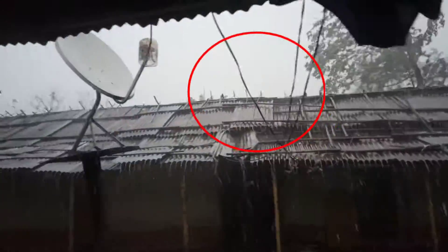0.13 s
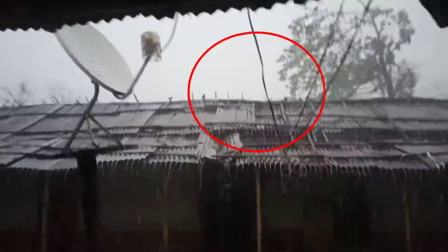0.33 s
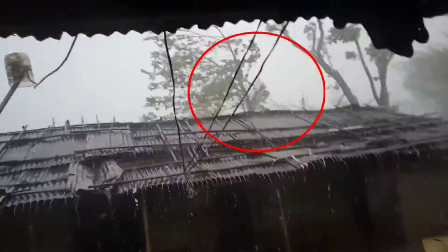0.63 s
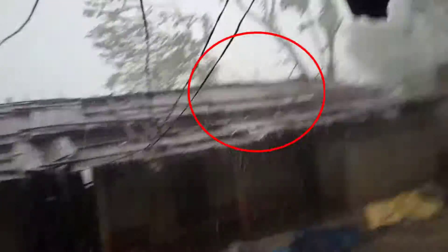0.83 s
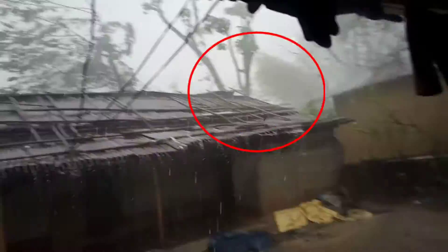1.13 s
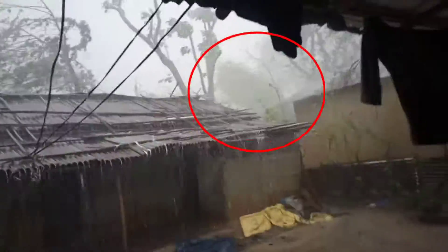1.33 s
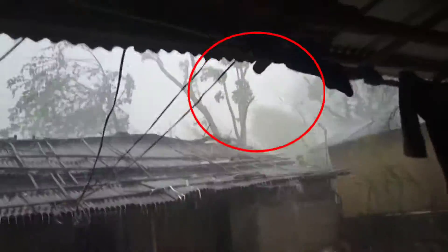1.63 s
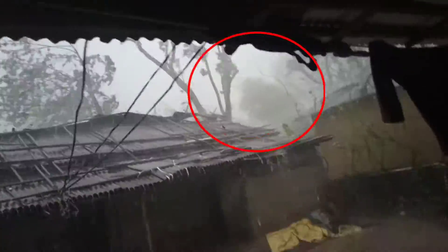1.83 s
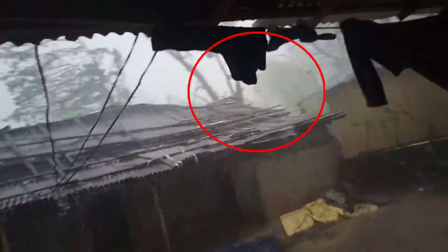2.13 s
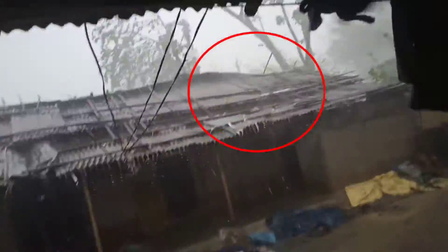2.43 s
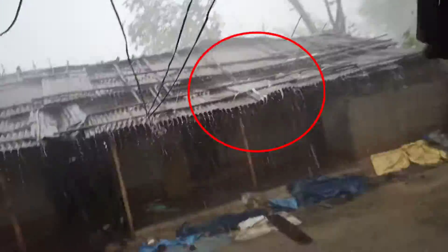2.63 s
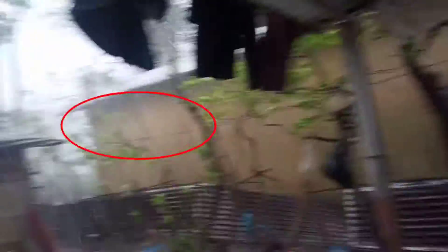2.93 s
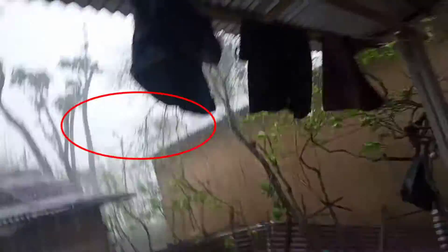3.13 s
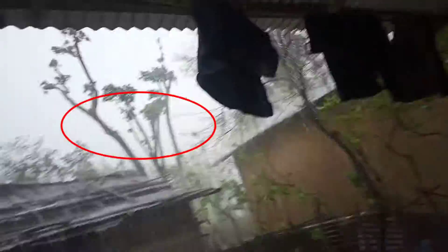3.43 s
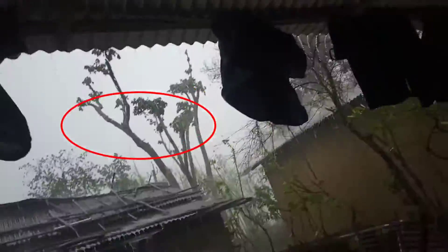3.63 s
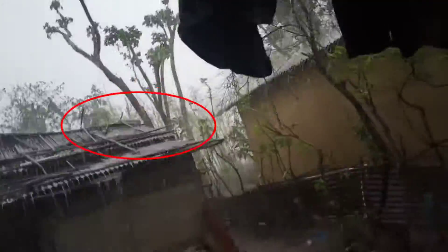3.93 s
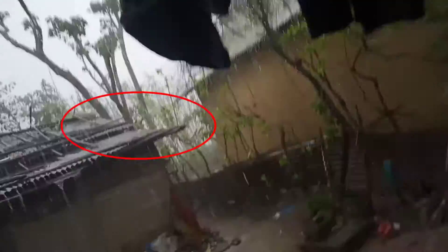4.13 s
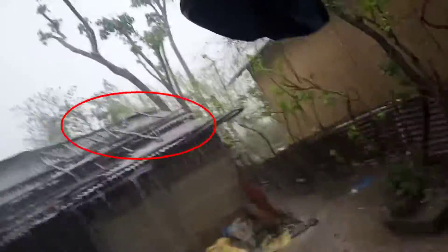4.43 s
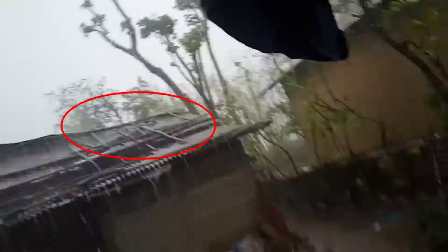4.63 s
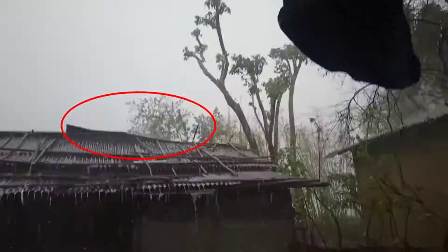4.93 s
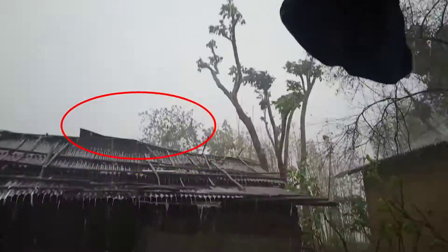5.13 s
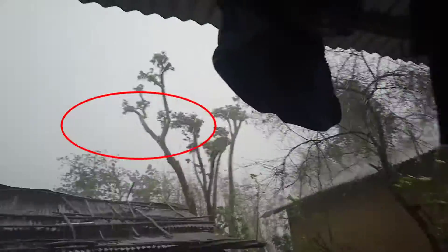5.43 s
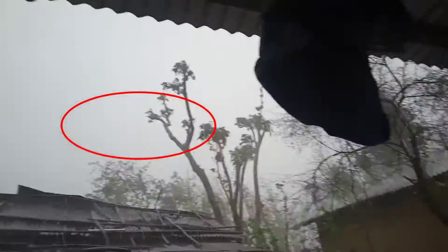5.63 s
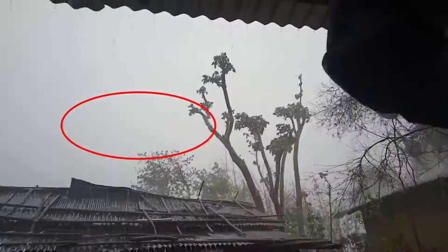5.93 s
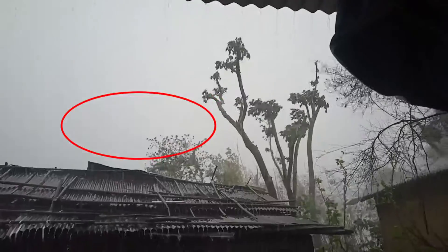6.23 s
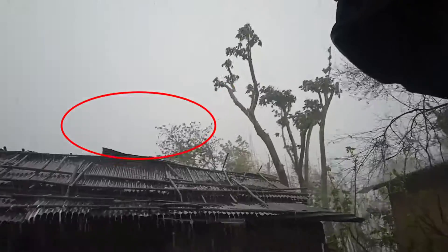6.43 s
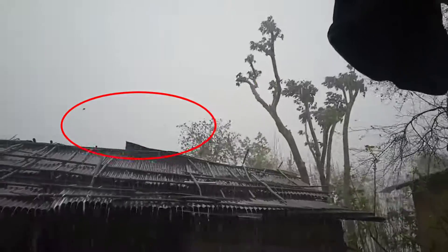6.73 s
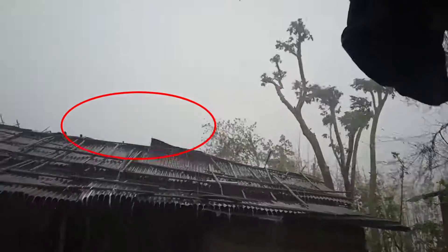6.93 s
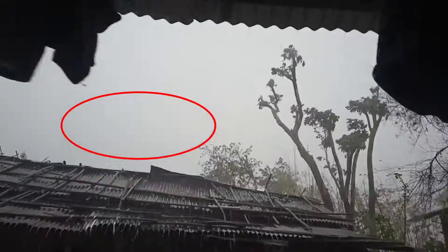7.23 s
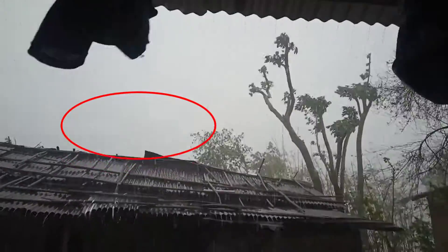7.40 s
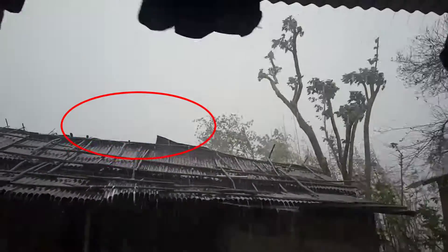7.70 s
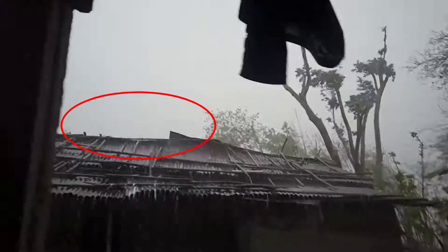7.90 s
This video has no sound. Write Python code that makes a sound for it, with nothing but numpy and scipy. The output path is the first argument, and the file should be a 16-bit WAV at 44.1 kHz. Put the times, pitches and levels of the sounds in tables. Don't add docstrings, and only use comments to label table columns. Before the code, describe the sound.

Heavy downpour hisses and drums on tin sheets, stops abruptly at three seconds, then fades back muffled, with wind thumps and scattered drips.

```python
import sys
import numpy as np
from scipy import signal
from scipy.fft import rfft, irfft, next_fast_len
from scipy.io import wavfile

SR = 44100
rng = np.random.default_rng(int(sys.argv[2]) if len(sys.argv) > 2 else 0)


def output_pcm(signal):
    pcm = np.clip(np.atleast_2d(signal).T, -1, 1) * 32767
    wavfile.write(sys.argv[1], SR, np.round(pcm).astype(np.int16))


def volts(x):
    e = np.asarray(x, float) / 20
    return 10 ** e


N = 355578
BREAK_S = 3.02


def rms_one(x):
    return x / np.sqrt(np.mean(x ** 2) + 1e-20)


def in_time(rows):
    time_s, value = np.transpose(rows)
    return np.interp(np.arange(N) / SR, time_s, value)


def drift(rate):
    coarse = 40
    r = np.exp(-2 * coarse * np.pi * rate / SR)
    noise = rng.standard_normal(N // coarse + 2002)
    slow = signal.lfilter([1], [1, -2 * r, r * r], noise)[2000:]
    return np.interp(np.arange(N) / coarse, np.arange(len(slow)), rms_one(slow))


def ring(push, hz, t60_s):
    r = volts(-60 / (t60_s * SR))
    w = 2 * np.pi * hz / SR
    return signal.lfilter([0, np.sin(w)], [1, -2 * r * np.cos(w), r * r], push)


def add(out, time_s, sound):
    i = round(time_s * SR)
    out[i:i + len(sound)] += sound[:N - i]


def high_pass(x, hz):
    return signal.sosfilt(signal.butter(2, hz, "high", fs=SR, output="sos"), x)


def blows(table, swell_share, trim_db):
    out = np.zeros(N)
    chance = rng.uniform(-1.38, 1, (len(table), 2))
    for (time_s, db, hz, t60_s), (under, over) in zip(table, chance):
        modes = (1, 1), (0.7 + 0.072 * under, 0.4), (1.6 + 0.142 * over, 0.5)
        width = round(swell_share * t60_s * SR)
        sound = 0
        for ratio, share in modes:
            push = np.zeros(SR // 2)
            push[:width] = np.hanning(width) * np.cos(2 * np.pi * ratio * hz * np.arange(width) / SR)
            sound = sound + share * rms_one(ring(push, ratio * hz, t60_s))
        add(out, time_s, volts(db + trim_db) * sound / np.abs(sound).max())
    return out


# (time [s], peak level [dB], frequency [Hz], t60 [s])
BUFFET_EVENTS = [(2.82, -32, 152, 0.15), (3.25, -36, 70, 0.107), (3.39, -31, 118, 0.12),
                 (3.94, -28.5, 98, 0.15), (3.99, -34, 59.6, 0.14), (4.925, -25, 135, 0.09),
                 (4.94, -34, 55.4, 0.091), (5.3, -37, 59.7, 0.18), (5.44, -35, 119, 0.092),
                 (5.6, -31, 123, 0.064), (5.745, -21, 176, 0.061), (5.755, -28, 71, 0.12),
                 (5.83, -32, 110, .1), (5.93, -37, 69, .08), (6.68, -28, 101, 0.16),
                 (7.155, -28, 151, 0.13), (7.226, -24, 124.6, 0.14), (7.32, -27, 144, 0.11),
                 (7.415, -25, 148, 0.1), (7.42, -37, 80, 0.14), (7.95, -32, 94.5, 0.17),
                 (8.0, -35, 50, 0.14), (5.86, -27.5, 167, 0.13), (7.24, -30, 50, 0.13),
                 (7.44, -29, 48, 0.13), (7.46, -28, 100, 0.092), (5.9, -32, 130, 0.18),
                 (7.88, -29, 115, .14)]


def buffets():
    return high_pass(blows(BUFFET_EVENTS, swell_share=0.24, trim_db=-2.5), 45)


# (time [s], peak level [dB], frequency [Hz], t60 [s])
BOOM_EVENTS = [(0.064, -16.5, 500, 0.12), (0.123, -24, 485, 0.14), (0.209, -21, 493, 0.11),
               (0.444, -22, 786, 0.084), (0.499, -23, 393, 0.15), (0.564, -23, 610, 0.096),
               (0.813, -17, 396, 0.078), (0.864, -18.5, 600, 0.1), (0.825, -22, 805, .14),
               (1.157, -24, 346, 0.14), (1.254, -21.5, 385, 0.077), (1.699, -22, 400, 0.12),
               (1.764, -25, 480, 0.067), (2.579, -23.5, 410, 0.11), (2.828, -25.5, 252, 0.13),
               (7.395, -18, 440, 0.1), (7.579, -16.5, 385, 0.099), (7.659, -15.5, 250, 0.17),
               (0.47, -20, 487, 0.13), (0.52, -19.5, 472, 0.13), (0.56, -21, 415, .1),
               (0.835, -19.5, 521, 0.12), (0.83, -22, 250, .12), (0.05, -21.5, 251, .1),
               (0.61, -26, 353, 0.16), (7.225, -19.5, 201, 0.11), (7.585, -19, 242, 0.12),
               (7.77, -21, 190, 0.086), (7.92, -20, 444, 0.092)]


def booms():
    return high_pass(blows(BOOM_EVENTS, swell_share=0.117, trim_db=-5.5), 180)


# (time [s], peak level [dB], frequency [Hz], t60 [s])
SPLAT_EVENTS = [
    (1.842, -22, 3000, 0.07),
    (1.863, -19, 5500, .09),
    (2.829, -19.5, 5540, 0.11),
    (4.795, -17, 2300, 0.05),
    (4.826, -18.5, 3330, 0.06),
    (4.876, -19, 3050, .04),
    (6.895, -28, 5500, 0.066),
]


def splats():
    out = np.zeros(N)
    t = np.arange(SR // 4) / SR
    for time_s, db, hz, t60_s in SPLAT_EVENTS:
        spray = rng.standard_normal(len(t)) * volts(-60 * t / t60_s) * np.minimum(t / 0.005, 1)
        band = signal.butter(2, [0.5 * hz, 2.05 * hz], "band", fs=SR, output="sos")
        sound = rms_one(signal.sosfilt(band, spray)) + 1.6 * rms_one(ring(spray, hz, 0.003))
        add(out, time_s, volts(db) * sound / np.abs(sound).max())
    return out


def hollow(hz, db, width_hz):
    r = np.exp(-np.pi * width_hz / SR)
    swell = signal.lfilter([1], [1, -2 * r, r * r], rng.standard_normal((2, N)))
    phase = 2 * np.pi * np.cumsum(hz) / SR
    return volts(db + 0.95 * drift(6.3)) * rms_one(swell[0] * np.cos(phase) + swell[1] * np.sin(phase))


def cupped_hand(sky, rain_db, gust_db):
    wall_hz, sky_hz = 1741, 2119
    wall = 1 - sky
    hz = wall_hz + sky * (sky_hz - wall_hz) + wall * 30 * gust_db + sky * 25 * rain_db
    db = -31 + 0.45 * rain_db + (sky * 0.42 - wall * 0.33) * gust_db
    return hollow(hz, db, width_hz=700.0)


def drops(per_s, spread_db, near_db):
    size_db = spread_db * np.minimum(rng.exponential(1, N), 5.5)
    sizes = volts(size_db) * rng.choice([-1, 1], N)
    near = sizes * (rng.random(N) < per_s / SR)
    return rms_one(rng.standard_normal(N) + volts(near_db) * rms_one(near))


SOURCE_EDGES = [25, 200, 1130, 4500, 16000]


def rush(impacts, levels_db, colour, lumpy_db):
    size = next_fast_len(N, True)
    octave = np.log2(np.maximum(np.arange(size // 2 + 1) * SR / size, 1))
    colour_hz, colour_db = np.transpose(colour)
    tint = volts(np.interp(octave, np.log2(colour_hz), colour_db))
    spectra = [tint * rfft(x, size) for x in impacts]
    out = np.zeros(N)
    for low, high, level_db, lump_db in zip(SOURCE_EDGES, SOURCE_EDGES[1:], levels_db, lumpy_db):
        source = 0
        for step in range(round(2 * np.log2(low)), round(2 * np.log2(high))):
            away = np.clip(2 * octave - step - 0.5, -1, 1)
            band = irfft(spectra[step % 2] * np.cos(away * np.pi / 2), size)[:N]
            source = source + band * (0.5 + lump_db / 8.9 * drift(8.7))
        out += volts(level_db + 0.15 * lump_db * drift(15.0)) * rms_one(source)
    return out


# (frequency [Hz], level [dB])
EAVE_COLOUR = [(25, -48.5), (45, -38), (80, -18), (150, -12), (250, -5), (390, -3.5), (600, -4.5),
               (1000, -7.5), (1700, -7.5), (5000, -7), (6100, -10), (7600, -18.5), (11500, -12.5),
               (15400, -24.5)]
# (frequency [Hz], level [dB])
WALL_COLOUR = [(25, -22), (170, -12), (260, -14), (510, -9), (830, -8), (1500, -11.5), (2400, -14.5),
               (3510, -13), (4240, -24.5), (6000, -25), (7300, -18.5), (9750, -30.5), (11800, -35.5),
               (15400, -34)]
# (frequency [Hz], level [dB])
SKY_COLOUR = [(25, -38), (190, -13), (450, -11.5), (1000, -13.5), (1500, -8.5), (2200, -11), (2750, -11.5),
              (3600, -9.5), (4800, -16.5), (5600, -18.5), (7870, -15), (9800, -27), (11800, -33.5),
              (15400, -32.5)]
# (time [s], share of sky [0-1])
HAND_TURN = [
    (4.3, 0.01),
    (4.42, .15),
    (4.5, .75),
    (4.6, .99),
]
# (time [s], level about mean [dB])
RAIN_WEIGHT = [(0.0, 0.5), (0.46, 2), (0.8, -2), (1.12, 0.5), (1.85, 0.5), (2.05, -1), (2.92, -0.5),
               (3.2, 1), (4.36, -0.1), (4.53, 3), (4.71, 2.5), (4.85, 2.5), (5.0, 1), (5.22, 3),
               (5.58, -0.5), (5.78, 1), (6.5, 0), (6.72, 1)]
# (time [s], level about mean [dB])
WIND_LOAD = [(0.3, 0), (0.52, 2), (0.72, 0.5), (1.45, 0), (2.1, -2.5), (2.5, -2), (2.85, 0.3), (3.2, 3),
             (3.32, 6), (3.66, 5), (3.8, 3), (4.25, 2), (4.62, 0), (6.4, 0.3), (7.05, 1), (7.5, 2.5),
             (7.9, 2.5), (8.06, 3)]
RAIN_SHARE = [0.1, 0.14, 1.23, 1.2]
GUST_SHARE = [1.2, 0.99, 0.35, 0.05]


def storm():
    eave_db, wall_db, sky_db = [-47, -32, -29, -30], [-51, -33.5, -30.5, -38], [-47, -34.5, -29.5, -37.5]
    lumpy_db = [0.85, 0.33, 0.19, 0.33]
    impacts = [drops(per_s=2500.0, spread_db=5.0, near_db=-9) for _ in range(2)]
    sky = np.clip(in_time(HAND_TURN), 0, 1)
    rain_db, gust_db = in_time(RAIN_WEIGHT), in_time(WIND_LOAD)
    swing_db = np.outer(RAIN_SHARE, rain_db) + np.outer(GUST_SHARE, gust_db)
    before = rush(impacts, swing_db + np.c_[eave_db], EAVE_COLOUR, lumpy_db)
    wall = rush(impacts, swing_db + np.c_[wall_db], WALL_COLOUR, lumpy_db)
    open_sky = rush(impacts[::-1], swing_db + np.c_[sky_db], SKY_COLOUR, lumpy_db)
    after = np.sqrt(1 - sky) * wall + np.sqrt(sky) * open_sky + cupped_hand(sky, rain_db, gust_db)
    return np.where(np.arange(N) < BREAK_S * SR, before, after)


def scene():
    nearer = volts(np.where(np.arange(N) < BREAK_S * SR, 4.5, 1.0))
    mono = storm() + nearer * (booms() + buffets() + splats())
    return np.array([mono, mono])


def break_gain():
    stop_s, fade_start_s, fade_s, fade_power = 2.9602, 3.0195, 0.16, 5.3
    t = np.arange(N) / SR
    fade = np.sin(np.pi / 2 * np.clip((t - fade_start_s) / fade_s, 0, 1)) ** fade_power
    return np.where(t < stop_s, 1, fade + volts(-84))


# (time [s], centre frequency [Hz])
SIDE_BANDS = [(0.356, 8900), (0.356, 12400), (0.588, 11700), (0.658, 14200), (0.797, 13100), (0.82, 8250),
              (0.844, 6450), (0.844, 12100), (1.029, 13450), (1.053, 5200), (1.215, 13850), (1.68, 9600),
              (2.121, 8500), (2.121, 10800), (2.121, 13200), (2.214, 9700), (2.214, 14250), (2.632, 6900),
              (2.632, 11600), (2.655, 4700), (2.655, 7500), (2.655, 13850), (2.887, 10700), (3.468, 6600),
              (3.468, 13900), (6.672, 4750), (7.461, 9050), (7.461, 12000), (7.461, 14000)]


def side_bands(mono, frame=2048):
    side = np.zeros(N)
    hz = np.arange(frame // 2 + 1) * SR / frame
    window = signal.windows.kaiser_bessel_derived(frame, 4 * np.pi)
    for time_s, centre_hz in SIDE_BANDS:
        i = round(time_s * SR) - 2 * frame
        width_hz = 700 + 0.075 * centre_hz
        inside = np.abs(hz - centre_hz) < width_hz / 2
        band = irfft(rfft(mono[i:i + frame]) * inside)
        add(side, time_s - frame / 2 / SR, band * window)
    return side


def low_pass(x):
    return signal.sosfilt(signal.butter(12, 15630, fs=SR, output="sos"), x)


def record(dry):
    ceiling = 0.33
    x = ceiling * np.tanh(dry * break_gain() / ceiling)
    x = x + volts(-2.5) * side_bands(x[0]) * np.array([[1], [-1]])
    return low_pass(x)


dry = scene()
out = record(dry)
output_pcm(out)
```